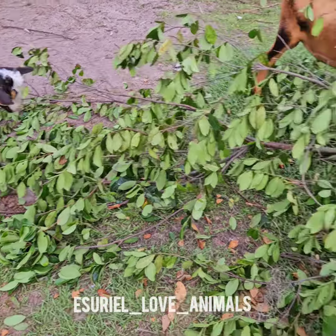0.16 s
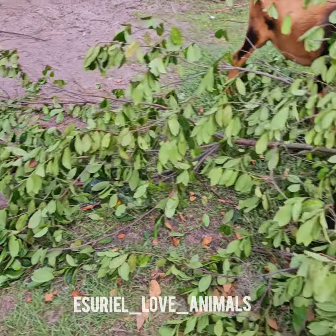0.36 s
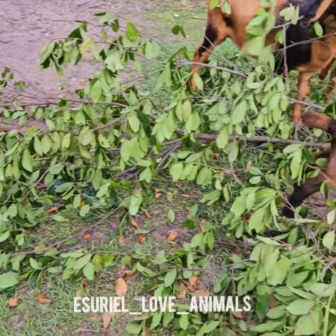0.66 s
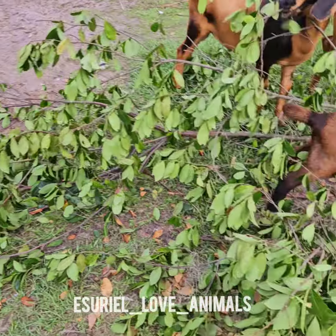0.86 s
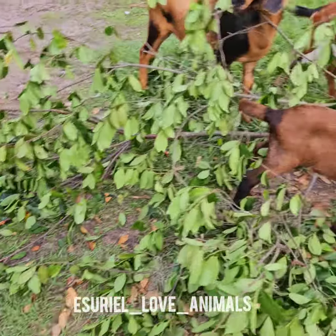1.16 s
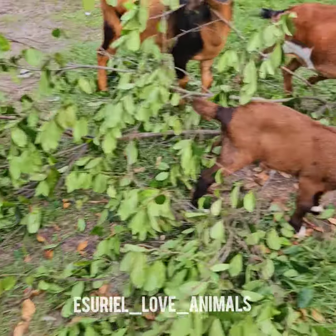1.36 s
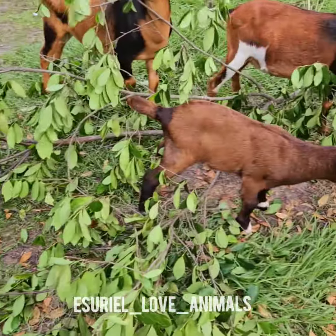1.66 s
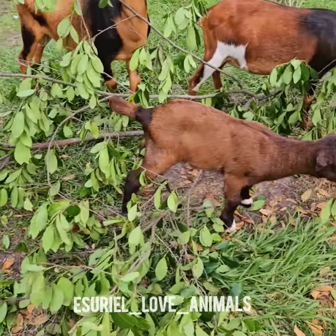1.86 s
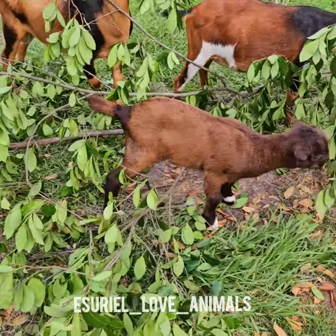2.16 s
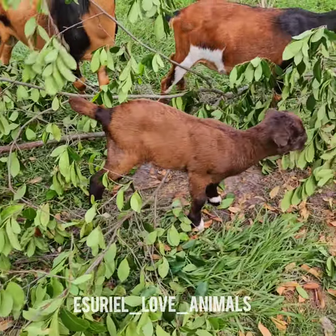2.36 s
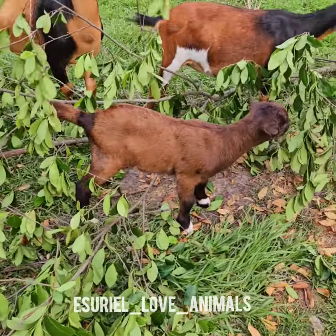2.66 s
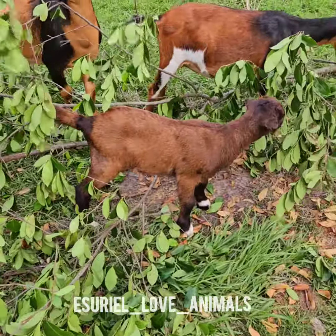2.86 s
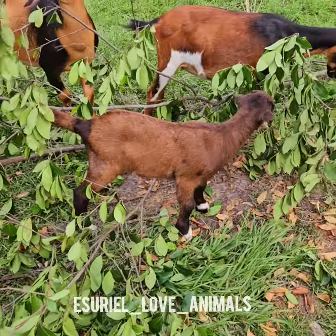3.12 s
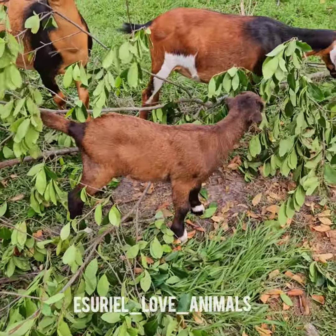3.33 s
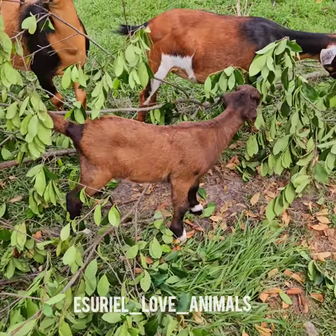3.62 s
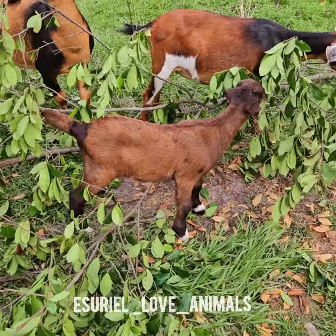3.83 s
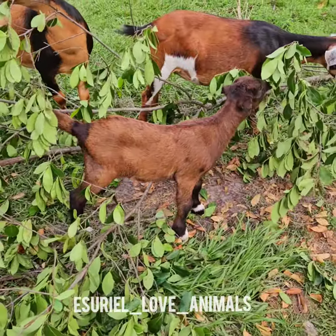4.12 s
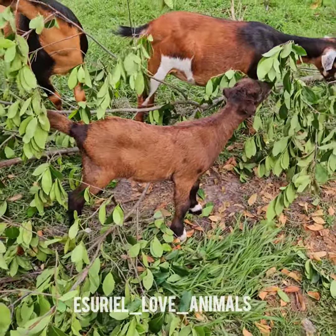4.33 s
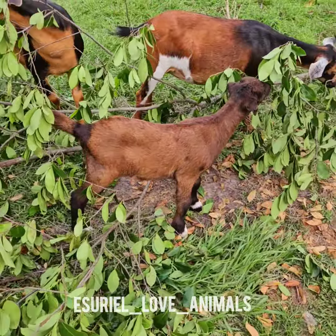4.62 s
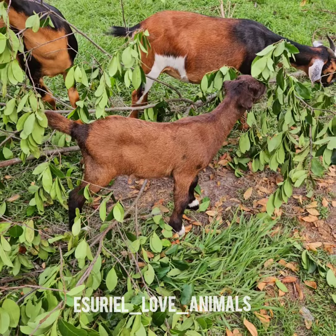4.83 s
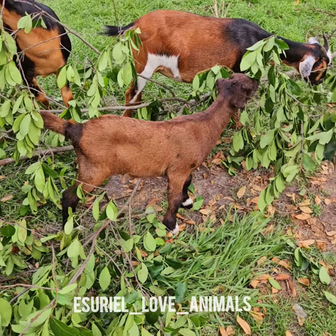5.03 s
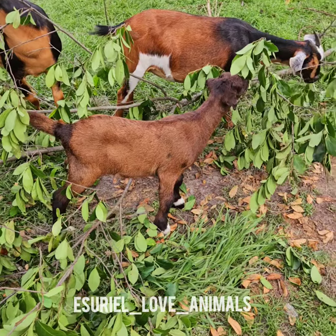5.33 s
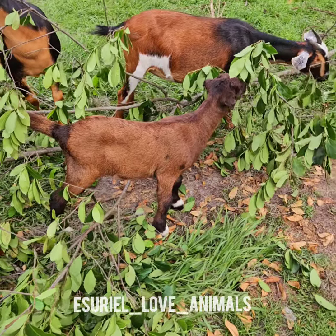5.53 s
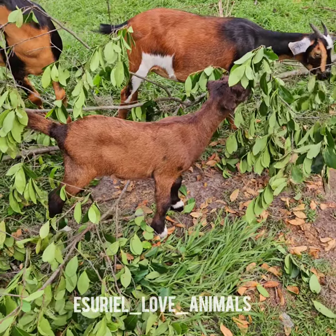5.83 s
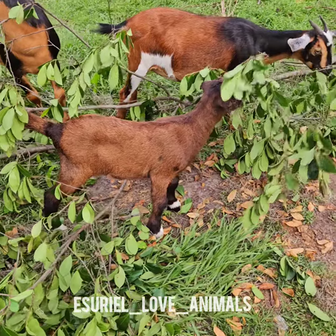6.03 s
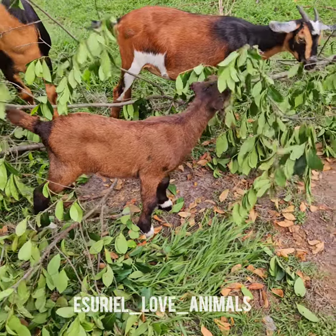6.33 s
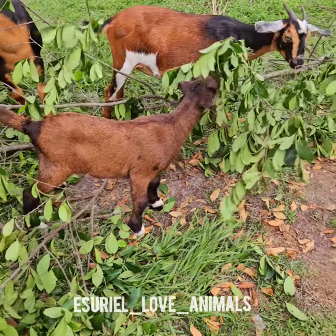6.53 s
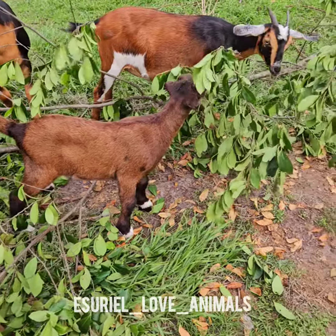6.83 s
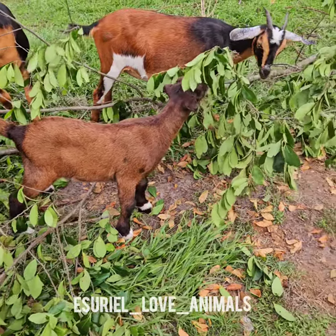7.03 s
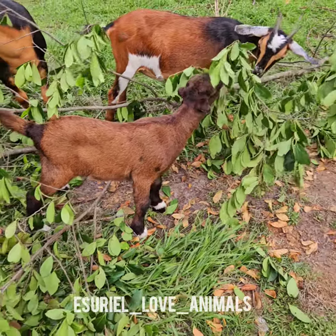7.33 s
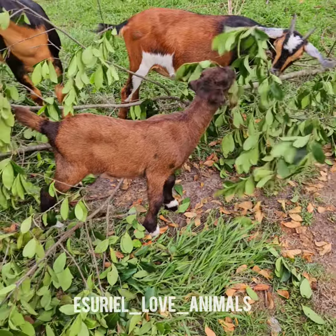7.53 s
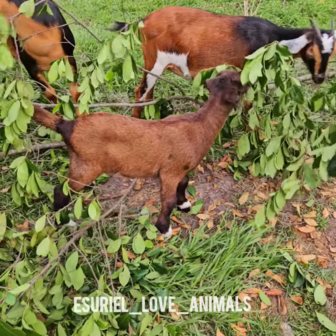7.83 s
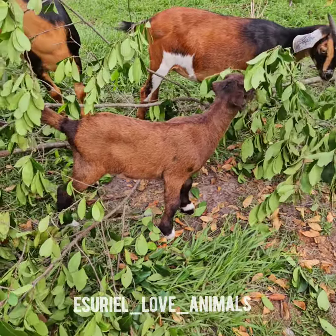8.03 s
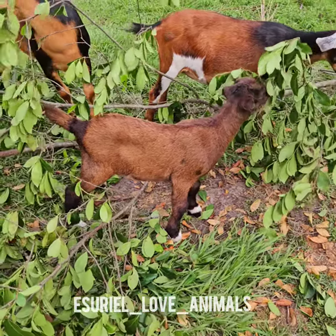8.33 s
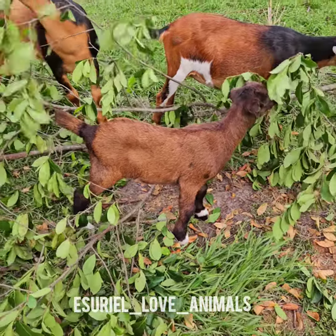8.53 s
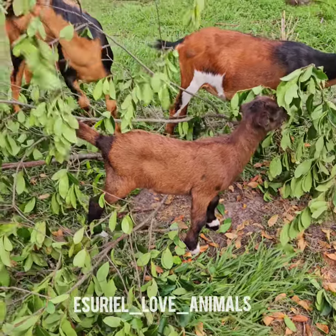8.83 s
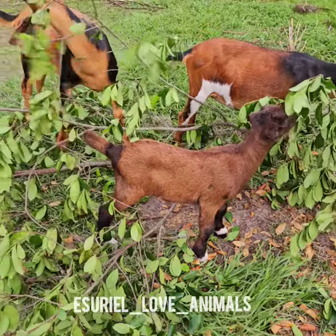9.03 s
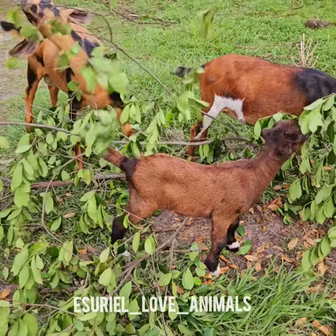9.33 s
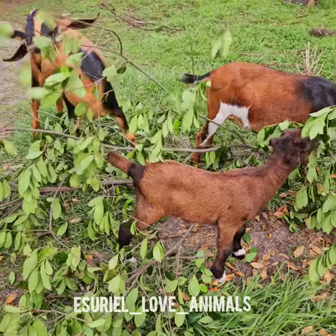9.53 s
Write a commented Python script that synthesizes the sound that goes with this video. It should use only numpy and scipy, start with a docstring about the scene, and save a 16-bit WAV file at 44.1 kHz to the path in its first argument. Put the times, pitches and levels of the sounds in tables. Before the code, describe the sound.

A steady low rumble and soft open-air wash surround the listener, easing slightly, with a blurred chorus of high far insects and thin wavering whines in the first five seconds. A dull hoof knock and twig snap come at the very start, another snap at 0.7. From 1.0 a cicada near 5 kHz gives quickening chirps. At 1.3 to 1.6 a goat makes one short quavering bleat in three rough heaves, the middle strongest; snaps and a leaf rustle follow at 1.9. Around 3.7 to 4.6 a goat calls low and nasal, mouth shut, pitch arching up and down with faint breath hiss. From 4.8 the cicada holds a buzz, throbbing at first, sagging after 7.3 and gone by 8. Twigs crack at 5.2 to 6.2, sharply at 6.2, then around 7.4, and most densely at 9 to 9.3 with rustling leaves, soft knocks and swelling shrill insects. Near, dry outdoor stereo.

```python
"""A steady low rumble and a chorus of far insects open the scene: shaped noise and thin tones, heard all around.
Outdoors, near two microphones, goats browse on cut branches: hooves thud, twigs snap (ringing or splintering
noise bursts) and leaves rustle (clumps of tiny cracks). A cicada chirps, then holds its note: clicks ring its body.
One goat gives a short quavering bleat, pulses and breath through an open throat;
later one calls low with its mouth shut, a stack of harmonics through the nose with a faint hiss of breath."""
import sys
import numpy as np
from scipy import signal
from scipy.fft import rfft, irfft, next_fast_len
from scipy.io import wavfile
from scipy.ndimage import uniform_filter1d, map_coordinates

SR = 44100
rng = np.random.default_rng(int(sys.argv[2]) if len(sys.argv) > 2 else 0)


def file_out(sig):
    """Save sig as 16-bit WAV at sys.argv[1]."""
    # one column per channel
    cols = np.atleast_2d(sig).T
    # limit, then scale
    lim = np.clip(cols, -1, 1)
    pcm = np.round(lim * 32767).astype(np.int16)
    wavfile.write(sys.argv[1], SR, pcm)


N = 426577
TIME = np.arange(N) / SR


def gain_of(db):
    """Decibels to amplitude."""
    return 10 ** (np.asarray(db) / 20)


def evened(x):
    """Scales to rms 1."""
    return x / np.sqrt(np.mean(x ** 2) + 1e-20)


def read(points, hz):
    """Reads a spectrum table on a log-frequency axis."""
    f, value = np.transpose(points)
    return np.interp(np.log(hz + 1), np.log(f + 1), value)


def follow(rows, t):
    """The columns of a curve table at times t."""
    s, *columns = np.transpose(rows)
    return [np.interp(t, s, column) for column in columns]


def add(mix, start_s, sound):
    """Lays a sound into the mix at start_s."""
    part = mix[max(round(start_s * SR), 0):][:len(sound)]
    part += sound[:len(part)]


def colour(x, db_at):
    """Filters x by a function from Hz to dB."""
    size = next_fast_len(x.shape[-1])
    gain = gain_of(db_at(np.fft.rfftfreq(size, 1 / SR)))
    return irfft(rfft(x, size) * gain, size)[..., :x.shape[-1]]


def wander(t, rate):
    """A smooth random curve of rms about 1, with about rate turns a second."""
    knots = rng.standard_normal(2048)
    return map_coordinates(knots, [(t - t[0]) * rate], order=3, mode="wrap")


def band(x, lo_hz, hi_hz):
    """A gentle causal band-pass."""
    sos = signal.butter(2, [lo_hz, min(hi_hz, .49 * SR)], "band", fs=SR, output="sos")
    return signal.sosfilt(sos, x)


# how long ground and bushes scatter each pitch: frequency_hz, t60_s (before scaling by ring)
YARD_DECAY = [(150, 0.023), (700, 0.29), (3000, 0.8), (8000, 0.13), (16000, 0.024)]


def yard(x, wet_db, lag_ms, pan_db, ring=1):
    """A source reaches two microphones directly (the right one lag_ms later) and scattered by ground and bushes."""
    taps = rng.choice([-1., 1.], (2, SR // 2)) * (rng.random((2, SR // 2)) < 1 / 10)
    taps[:, :SR // 500] = 0  # nothing scattered arrives in the first 2 ms
    hz, t, z = signal.stft(taps, SR, nperseg=256)
    t60_s = ring * read(YARD_DECAY, hz)[:, None]
    tail = signal.istft(z * gain_of(-60 * t / t60_s), SR, nperseg=256)[1]
    wet = signal.fftconvolve(x[None], tail / np.linalg.norm(tail[0]), axes=1)[:, :N]
    right = map_coordinates(x, [np.arange(N) - lag_ms * SR / 1000], order=3)
    direct = np.array([x, right])
    return direct * gain_of([[pan_db / 2], [-pan_db / 2]]) + gain_of(wet_db) * wet


# how alike all-around sound is at the two microphones: frequency_hz, likeness (-1 to 1)
LIKENESS = [(60, 0.99), (200, 0.96), (330, 0.74), (500, 0.72), (770, 0.51), (1170, 0.079), (1800, -0.21),
            (2800, -0.15), (4800, 0.0041), (6400, 0.17), (10000, -0.037)]


def diffuse(db_at, patchy_db):
    """Noise from all around at rms 1, with drifting patches; the two sides agree mostly in the bass."""
    frames, hz = N // 512 + 5, np.fft.rfftfreq(2048, 1 / SR)
    a, b, c, d, patches = rng.standard_normal((5, frames, len(hz))).transpose(0, 2, 1)
    patches = uniform_filter1d(patches, size=16, axis=0)
    patches = evened(uniform_filter1d(patches, size=9, axis=1))
    same = np.clip(read(LIKENESS, hz), -1, 1)[:, None]
    left = a + 1j * b
    right = same * left + np.sqrt(1 - same ** 2) * (c + 1j * d)
    z = np.array([left, right]) * gain_of(db_at(hz)[..., None] + patchy_db * patches)
    return evened(signal.istft(z, nperseg=2048, noverlap=1536)[1][:, :N])


# shape of the low rumble: frequency_hz, relative_db per Hz
RUMBLE_SHAPE = [(15, -32), (25, -42), (32, -26), (40, -2.5), (76, -3.5), (86, 4), (97, -4), (135, -5),
                (185, -6.5), (215, -13.5), (260, -18.5), (310, -29), (450, -57), (900, -75)]
# brief swells of the rumble: middle_s, rise_db, length_s
SWELLS = [(1.48, 3.5, 0.26), (2.6, 2, 0.14), (5.1, 2.5, .35)]
# shape of the open air: frequency_hz, relative_db per Hz
AIR_SHAPE = [(100, -12), (350, -5), (430, -4.5), (600, -1), (850, -1), (1150, -3), (1400, -3), (1900, -9.5),
             (2600, -18.5), (3500, -20.5), (4300, -15.5), (6500, -17), (12000, -21), (16000, -35)]
# levels at the start, and how fast they ease off
RUMBLE_DB, RUMBLE_FADE_DB_PER_S = -40, 0.15
AIR_DB, AIR_FADE_DB_PER_S = -53, 0.3845


def background(swell_db=1.2, lowest_hz=35):
    """A far low rumble under the soft wash of open air, both shaped noise; both ease off slowly."""
    rumble_db = RUMBLE_DB - RUMBLE_FADE_DB_PER_S * TIME
    for middle_s, rise_db, length_s in SWELLS:
        rumble_db = rumble_db + rise_db * np.exp(-(2 * (TIME - middle_s) / length_s) ** 2)
    rumble = gain_of(rumble_db) * diffuse(lambda f: read(RUMBLE_SHAPE, f), patchy_db=0.0)
    rumble = colour(rumble, lambda f: -10 * np.log10(1 + (lowest_hz / (f + 1)) ** 8))
    rumble = rumble * gain_of([[.25], [-.25]])
    air_db = AIR_DB - AIR_FADE_DB_PER_S * TIME + swell_db * wander(TIME, 2.38)
    return rumble + gain_of(air_db) * diffuse(lambda f: read(AIR_SHAPE, f), patchy_db=1.5)


# kinds of far insect: frequency_hz, width_hz, relative_db, left_minus_right_db (the whole level gap)
INSECT_BANDS = [(4860, 630, -61.5, -8), (7606, 520, -60, -1.5), (8290, 1320, -61.5, -4.5),
                (9720, 1330, -61, 6.5), (13940, 3400, -64.5, -0.5)]
# a shrill band of far cicadas: time_s, level_db
SHRILL_LEVEL = [(0, -87), (4, -62.5), (7.2, -69), (7.9, -66.5), (9, -60.5), (9.67, -68)]
CHORUS_DB, CHORUS_FADE_DB_PER_S = -56, 0.12


def chorus(ripple_db=3.0, shrill_hz=4850, shrill_width_hz=480):
    """Many far insects blur into a few bands, each kind from its own side; their pitches leave fine steady ridges."""
    def bands(f):
        power = 0
        for centre_hz, width_hz, db, side_db in INSECT_BANDS:
            hump = 2 ** -((2 * (f - centre_hz) / width_hz) ** 2)
            # amplitude formula on 2 * db gives power, so +-side_db shifts each side by half of it
            power = power + gain_of(2 * db + np.array([[side_db], [-side_db]])) / width_hz * hump
        ridges = evened(uniform_filter1d(rng.standard_normal((2, len(f))), size=3, axis=1))
        return 10 * np.log10(power + 1e-20) + ripple_db * ridges

    shrill = diffuse(lambda f: -3 * (2 * (f - shrill_hz) / shrill_width_hz) ** 2, patchy_db=0.0)
    shrill = shrill * gain_of([[-2], [2]])  # towards the right
    far_db = CHORUS_DB - CHORUS_FADE_DB_PER_S * TIME
    far = gain_of(far_db + 0.29 * wander(TIME, 1.6)) * diffuse(bands, patchy_db=0.94)
    return far + gain_of(follow(SHRILL_LEVEL, TIME)[0]) * shrill


# farther insects, each a thin whine near one pitch: start_s, end_s, pitch_hz (early), pitch_hz (late), level_db
THIN_WHINES = [(0, 1.6, 4860, 4900, -72), (1.5, 3.7, 4930, 5050, -70), (1.3, 3.5, 5470, 5440, -78),
               (2, 4.7, 4790, 4750, -74)]


def whines(waver=0.00365):
    """Far insects as thin, slightly unsteady whines, each holding about one pitch, that swell and fade."""
    out = np.zeros(N)
    for start_s, end_s, early_hz, late_hz, level_db in THIN_WHINES:
        t = np.arange(start_s, end_s, 1 / SR)
        hz = np.linspace(early_hz, late_hz, len(t)) * (1 + waver * wander(t, 90))
        tone = evened(np.sin(2 * np.pi * np.cumsum(hz) / SR))
        add(out, start_s, gain_of(level_db) * tone * signal.windows.tukey(len(t), .3))
    return yard(out, wet_db=-8.5, lag_ms=0, pan_db=-8)


# rustles of the leaves and, at 4.194 s, breath of the shut-mouth call, a faint broad hiss:
# middle_s, level_db (before the leaf colour), length_s
RUSTLES_AND_BREATH = [(1.869, -75, 0.089), (2.453, -79, .26), (4.194, -71, 0.23), (6.98, -78, 0.25),
                      (7.377, -72, 0.27), (8.424, -78, 0.23), (8.986, -71, 0.095), (9.27, -73.5, 0.2)]
# colour of the leaves: frequency_hz, relative_db per Hz
LEAF_COLOUR = [(300, -18), (900, -5), (2000, -6), (3200, -1), (5000, 3.5), (8000, 3), (13000, -7),
               (16000, -6)]


def leaves_and_breath(ticks_per_s=7, tick_db=-55, grains_per_s=250):
    """Clumps of tiny cracks for rustling leaves and one faint hiss of breath, and stray ticks of nibbling."""
    ticks = rng.random(N) < ticks_per_s / SR
    out = gain_of(tick_db) * np.minimum(rng.exponential(1, N), 4) * ticks
    for middle_s, level_db, length_s in RUSTLES_AND_BREATH:
        size = int(length_s * SR)
        cracks = rng.standard_normal(SR)[:size] * (rng.random(SR)[:size] < grains_per_s / SR)
        add(out, middle_s - length_s / 2, gain_of(level_db) * evened(cracks) * np.hanning(size))
    # every crack becomes a tiny dying burst of noise
    t = np.arange(SR // 100) / SR
    grain = 3 * evened(rng.standard_normal(len(t)) * np.exp(-t / 0.00053)) / np.sqrt(len(t))
    out = signal.oaconvolve(out, grain)[:N]
    return yard(colour(out, lambda f: read(LEAF_COLOUR, f)), wet_db=5, lag_ms=0, pan_db=-16)


# dull knocks of hooves and branches on the soil: start_s, level_db (before the soft rise), pitch_hz
KNOCKS = [(.021, -28.5, 471), (1.17, -45, 310), (1.533, -40.5, 560), (1.884, -44, 648), (3.369, -41.5, 333),
          (5.192, -48.5, 328), (7.391, -37, 362), (8.902, -38.5, 335)]
THUD_CYCLES = 44  # a knock falls by 60 dB in this many cycles


def hooves(rise_s=0.0045, scuff=0.66):
    """A soft blow rings briefly as a dying sine and scuffs the soil as noise around the same pitch."""
    out, t = np.zeros(N), np.arange(SR // 4) / SR
    for start_s, level_db, hz in KNOCKS:
        soil = evened(band(rng.standard_normal(len(t)), hz * 0.77, hz * 1.2))
        knock = np.sin(2 * np.pi * hz * t) + scuff * soil
        dying = gain_of(level_db - 60 * t * hz / THUD_CYCLES)
        add(out, start_s, dying * (1 - np.exp(-t / rise_s)) * knock)
    return yard(out, wet_db=-26, lag_ms=0, pan_db=3.0)


# twigs and leaf stalks snapping: start_s, level_db (before ring_db and scaling),
# body_db and top_db (gains of the low body and the bright top beside the crack)
TWIG_SNAPS = [(.055, -34, 11.5, -12), (.688, -34.5, -21, -4), (1.133, -38.5, 1, -8), (1.874, -35, 12, -12),
              (1.883, -33, 15, -9), (5.225, -39, 9, -15), (5.657, -38.5, 6, -13), (6.01, -40, 2, -12),
              (6.177, -31, -8, 1.5), (6.219, -31, 11, -3), (6.229, -41, 17, -14), (6.803, -37, -10, -12),
              (6.951, -39, -12, -12), (7.35, -37.5, -1, -10), (7.394, -37.5, 2, -10),
              (7.477, -38.5, 7, -12), (7.81, -45, -15, 5), (8.728, -39, 0, -8), (8.955, -33.5, -4, 0),
              (9.174, -30.5, -2, 1.5), (9.198, -37, 5, 1), (9.264, -38, 0, 1), (9.289, -34.5, 22, -10),
              (9.579, -40.5, 4, -12)]
SNAP_T60_S = 0.027


def twigs(ring_db=-2, splinter=0.76):
    """Each snap is one sharp break and a few milliseconds of splintering: a woody body, a crack and a bright top."""
    out, t = np.zeros(N), np.arange(SR // 8) / SR
    for start_s, level_db, body_db, top_db in TWIG_SNAPS:
        burst = splinter * rng.standard_normal(len(t)) * gain_of(-60 * t / SNAP_T60_S)
        burst[0] += 1.5  # the sharp break
        body = gain_of(body_db) * band(band(burst, 600, 2340), 670, 2130)
        crack = band(burst, 3880, 7700)
        top = gain_of(top_db) * band(burst, 9900, 14000)
        snap = body + crack + top
        add(out, start_s, gain_of(level_db + ring_db) * snap / np.linalg.norm(snap) * 4)
    return yard(out, wet_db=-9, lag_ms=-0.022, pan_db=-2.5)


# ringing of the cicada's body: frequency_hz, relative_db
CICADA_RINGING = [(4200, -22), (4520, -9), (4700, -10), (4860, 0), (5030, 0), (5200, -1), (5360, -13),
                  (5700, -24)]
# the opening chirps come ever closer and grow
FIRST_CHIRP_S, CHIRP_GAP_S, CHIRP_QUICKENING_S = 1.0, .476, .0042
CHIRP_DB, CHIRP_GROWTH_DB_PER_S = -61, 0.5
CHIRP_CLICKS_PER_S, CHIRP_SAG_PER_S, CHIRP_S = 168.6, 17, .34
# then they merge into a held note, which finally runs down
HELD_START_S, RUN_DOWN_S, HELD_END_S, HELD_DB = 4.82, 7.3, 8.0, -63
HELD_CLICKS_PER_S, HELD_CLIMB_PER_S, RUN_DOWN_PER_S = 166.9, .3, 6.5
# the chirping lingers as a fading throb, softest where the clicks are fastest
THROB_AT_S, THROB_PERIOD_S, THROB_FADE_S = 5.33, .29, 1.66
THROB_CLICKS_PER_S, THROB_DB = 1.58, 2.5


def cicada(jitter=0.00211, fade_db_per_s=18, count=9):
    """Rapid clicks ring the body near 5 kHz; the rate sags through each chirp, then nearly holds."""
    def buzz(t, db, rate):
        turns = np.cumsum(rate * (1 + jitter * wander(t, 110))) / SR
        lines = np.zeros(len(t))
        for k in np.arange(25, 35):  # the harmonics of the click rate that the body rings
            level = gain_of(read(CICADA_RINGING, k * rate)) * (1 + .35 * wander(t, 25))
            lines += level * np.cos(2 * np.pi * k * turns)
        return gain_of(db) * evened(lines)

    out, t = np.zeros(N), np.arange(0, CHIRP_S, 1 / SR)
    for k in range(count):
        start_s = FIRST_CHIRP_S + k * (CHIRP_GAP_S - k * CHIRP_QUICKENING_S)
        db = CHIRP_DB + CHIRP_GROWTH_DB_PER_S * (start_s - FIRST_CHIRP_S)
        chirp = buzz(t, db - fade_db_per_s * t, CHIRP_CLICKS_PER_S - CHIRP_SAG_PER_S * t)
        add(out, start_s, chirp * signal.windows.tukey(len(t), .4))
    t = np.arange(HELD_START_S, HELD_END_S, 1 / SR)
    throb = np.cos(2 * np.pi * (t - THROB_AT_S) / THROB_PERIOD_S) * np.exp(-(t - t[0]) / THROB_FADE_S)
    rate = HELD_CLICKS_PER_S + HELD_CLIMB_PER_S * (t - t[0])
    rate = rate - RUN_DOWN_PER_S * np.maximum(t - RUN_DOWN_S, 0)
    held = buzz(t, HELD_DB - THROB_DB * throb, rate + THROB_CLICKS_PER_S * throb)
    add(out, t[0], held * signal.windows.tukey(len(t), .15))
    return yard(out, wet_db=-10, lag_ms=-.02, pan_db=-5)


HEAVE_RISE_S, HEAVE_SAG_DB_PER_S, HEAVE_RELEASE_DB_PER_S = .018, 66, 420


def heave(t, length_s):
    """The envelope of one heave: a quick rise, a sagging hold, a release."""
    sag_db = HEAVE_SAG_DB_PER_S * np.maximum(t, 0)
    release_db = HEAVE_RELEASE_DB_PER_S * np.maximum(t - length_s, 0)
    return np.clip(t / HEAVE_RISE_S, 0, 1) * gain_of(-(sag_db + release_db))


# resonances of the open throat: frequency_hz, width_hz, relative_db
THROAT_PEAKS = [(634, 260, 1.5), (1425, 150, 5), (2500, 420, -5.5), (2860, 240, 0), (3230, 460, -6),
                (3760, 700, -6), (4590, 900, -8)]
# heaves of the bleat: start_s, length_s, effort_db, middle_pitch_hz, roughness (0-1),
# top_db (the rasping top against the body)
BLEAT_HEAVES = [(1.269, 0.047, -53.5, 344.2, 0.42, -9), (1.359, 0.0796, -42.5, 347.2, 0.22, -12.5),
                (1.48, 0.059, -46, 335.8, 0.34, -6.5)]
HEAVE_GLIDE_HZ_PER_S = 97  # the pitch climbs through a heave
BODY_LAG_S, EDGE_DB = .016, -2  # the treble leads, the body follows; the middle against the body
SLACK_ROUGH, SLACK_DB, BLEAT_TAIL_S = 0.5, -61.5, 0.11  # between and after heaves the voice is weak and rough


def bleat(jitter=.007, flank_db=-20, shimmer=.16, hiss_db=-4):
    """Glottal pulses and puffs of air through the open throat; each heave starts pressed and bright, then mellows."""
    first_s, end_s = BLEAT_HEAVES[0][0], BLEAT_HEAVES[-1][0] + BLEAT_HEAVES[-1][1]
    t = np.arange(first_s, end_s + BLEAT_TAIL_S, 1 / SR)
    low = middle = high = gain_of(SLACK_DB) * signal.windows.tukey(len(t), .3)
    rough, pitch = np.full(len(t), SLACK_ROUGH), []
    for start_s, length_s, db, middle_hz, heave_rough, top_db in BLEAT_HEAVES:
        push = heave(t - start_s, length_s)
        late_push = heave(t - start_s - BODY_LAG_S, length_s - BODY_LAG_S)
        low = np.hypot(low, gain_of(db) * late_push)
        middle = np.hypot(middle, gain_of(db + EDGE_DB) * push)
        high = np.hypot(high, gain_of(db + top_db) * push)
        rough = rough + (heave_rough - SLACK_ROUGH) * push / push.max()
        glide_hz = HEAVE_GLIDE_HZ_PER_S * length_s / 2
        pitch += [(start_s, middle_hz - glide_hz), (start_s + length_s, middle_hz + glide_hz)]
    rough = np.clip(rough, 0, 1)
    turns = np.cumsum(follow(pitch, t)[0] * (1 + jitter * wander(t, 267))) / SR
    pulses = sum(np.cos(2 * np.pi * k * turns) for k in np.arange(1, 22))
    folds = (1 + shimmer * wander(t, 170)) * pulses
    # a puff of hiss with every pulse
    puffs = gain_of(hiss_db) * np.exp(-(turns % 1) / 1.6) * rng.standard_normal(len(t))

    def throat(f):
        peaks = sum(gain_of(2 * db) / (1 + (2 * (f - c) / w) ** 2) ** 2 for c, w, db in THROAT_PEAKS)
        flanks = gain_of(2 * flank_db) * (f > 250) / (1 + (f / 4500) ** 8)
        return 10 * np.log10(peaks + flanks)

    voice = colour((1 - rough) * evened(folds) + 3 * rough * puffs, throat)
    lower = colour(voice, lambda f: -10 * np.log10(1 + (f / 1900) ** 12))
    upper = colour(voice, lambda f: -10 * np.log10(1 + (3900 / (f + 1)) ** 14))
    body, edge = np.zeros(N), np.zeros(N)
    add(body, t[0], low * evened(lower))
    add(edge, t[0], middle * evened(voice - lower - upper) + high * evened(upper))
    # the leaves scatter the treble more than the body of the voice
    body = yard(body, wet_db=-14, lag_ms=.03, pan_db=0)
    return body + yard(edge, wet_db=-5, lag_ms=.08, pan_db=0, ring=.12)


# course of the shut-mouth call: time_s, pitch_hz
CALL_PITCH = [(3.66, 135.8), (3.73, 151), (3.754, 157), (3.832, 175.2), (4.052, 207.7), (4.214, 212.7),
              (4.326, 208.1), (4.518, 192.7), (4.6, 167.6)]
# its fundamental, before the nose: time_s, level_db
CALL_FUNDAMENTAL = [(3.66, -44), (3.745, -37), (3.8, -51), (3.86, -33), (3.98, -42.5), (4.1, -34),
                    (4.31, -32.5), (4.42, -40), (4.6, -47)]
# the passage through the nose: frequency_hz, gain_db
NOSE_PASSAGE = [(130, -4), (210, 2), (300, -29), (380, -20.5), (425, -31.5), (570, -26), (635, -26),
                (740, -23.5), (845, -16), (970, -15.5), (1020, -16.5), (1070, -31.5), (1300, -55),
                (1700, -43.5), (2300, -36), (3000, -37.5), (3350, -43), (3620, -27.5), (4100, -47),
                (4600, -46), (6000, -56)]
# the overtones at the highest pitch, before the nose; they grow with the pitch, the treble most
OVERTONES_DB, OVERTONES_DB_PER_OCTAVE, TREBLE_DB, TREBLE_DB_PER_OCTAVE = -36.5, 16, 3, 28


def hum(jitter=.002, wobble=.003, shimmer=.3):
    """A clean arched call through the nose: strong fundamental, the overtones growing as the pitch rises."""
    t = np.arange(CALL_PITCH[0][0], CALL_PITCH[-1][0], 1 / SR)
    hz, fundamental_db = follow(CALL_PITCH, t)[0], follow(CALL_FUNDAMENTAL, t)[0]
    octaves = np.log2(hz / hz.max())
    overtones_db = OVERTONES_DB + OVERTONES_DB_PER_OCTAVE * octaves
    treble_db = TREBLE_DB + TREBLE_DB_PER_OCTAVE * octaves
    turns = np.cumsum(hz * (1 + jitter * wander(t, 110) + wobble * wander(t, 22.2))) / SR
    voice = np.zeros(len(t))
    for k in np.arange(1, 27):
        source_db = fundamental_db if k == 1 else overtones_db
        level_db = read(NOSE_PASSAGE, k * hz) + source_db + treble_db * (k > 7)
        flutter = 1 + shimmer * min(k / 4, 2) * wander(t, 28.98)
        voice += gain_of(level_db) * flutter * np.cos(2 * np.pi * k * turns)
    out = np.zeros(N)
    add(out, t[0], np.sqrt(2) * voice * signal.windows.tukey(len(t), .14))
    return yard(out, wet_db=-15, lag_ms=.09, pan_db=0)


def scene():
    """Air and insects, browsing goats, a cicada and two calls."""
    surroundings = background() + chorus() + whines()
    near = leaves_and_breath() + hooves() + twigs()
    return surroundings + near + cicada() + bleat() + hum()


EDGE_HZ = 15800


def record(dry):
    """The recorder's band limit: a steep low-pass at EDGE_HZ."""
    low_pass = signal.firwin(511, EDGE_HZ, window=("kaiser", 9), fs=SR)
    return signal.oaconvolve(dry, low_pass[None], "same")


dry = scene()
out = record(dry)
file_out(out)
```